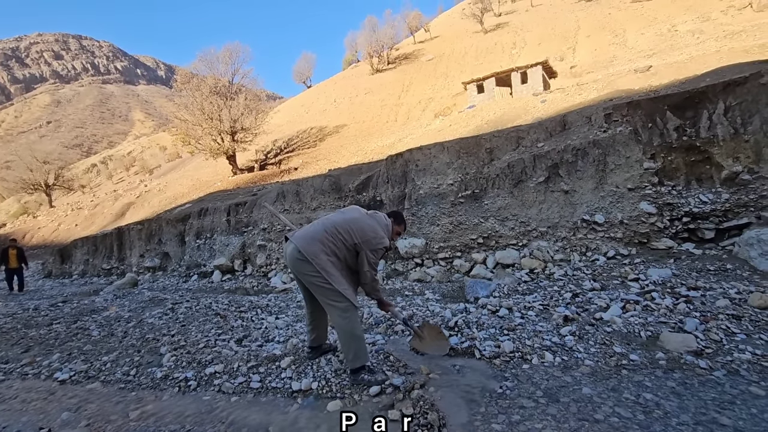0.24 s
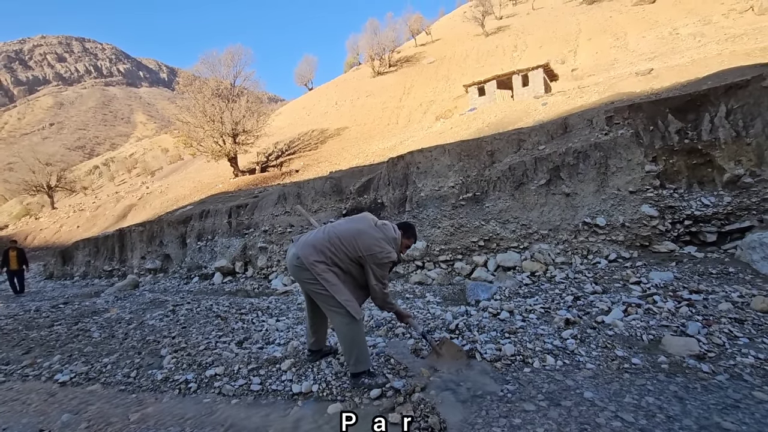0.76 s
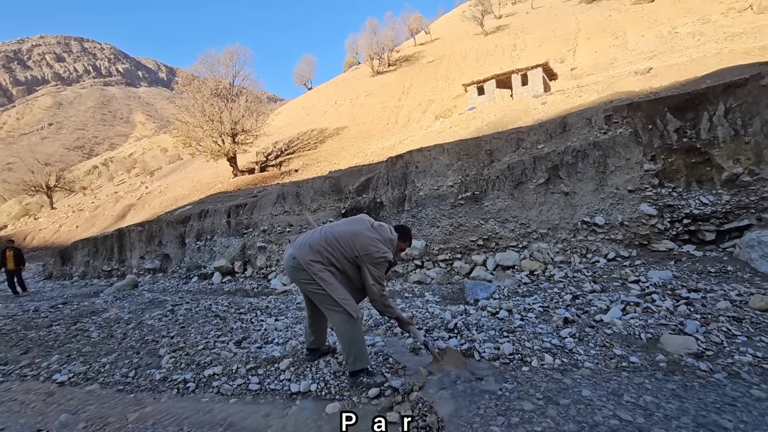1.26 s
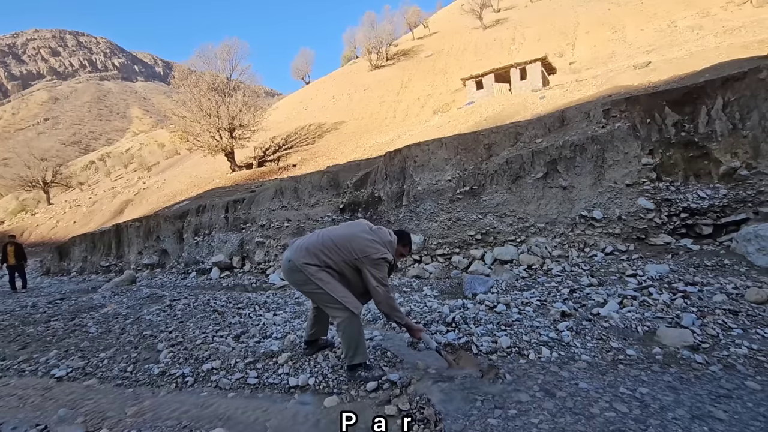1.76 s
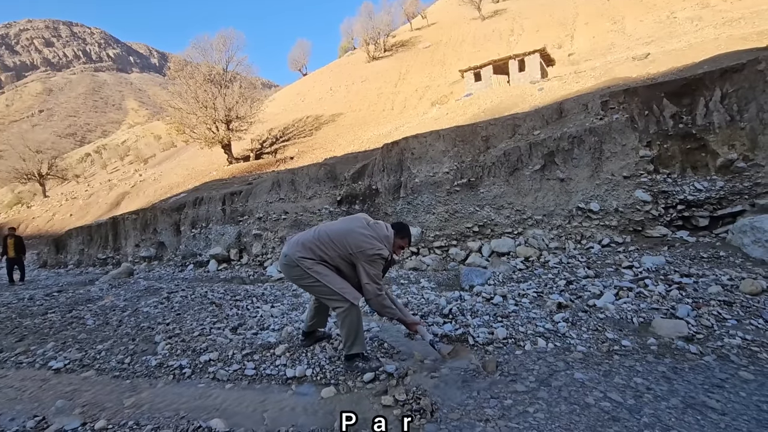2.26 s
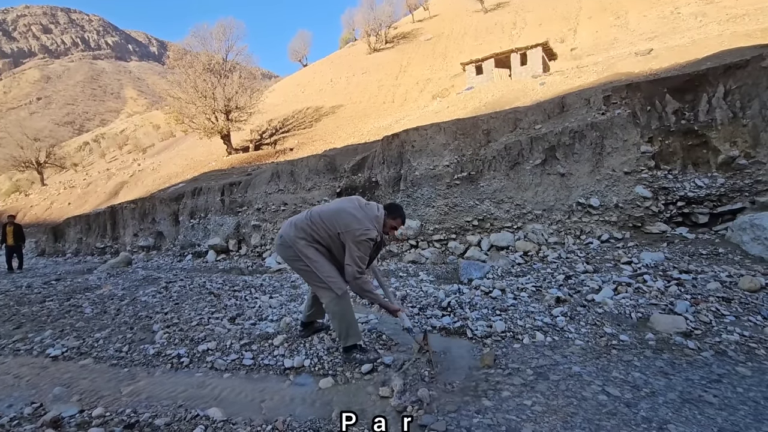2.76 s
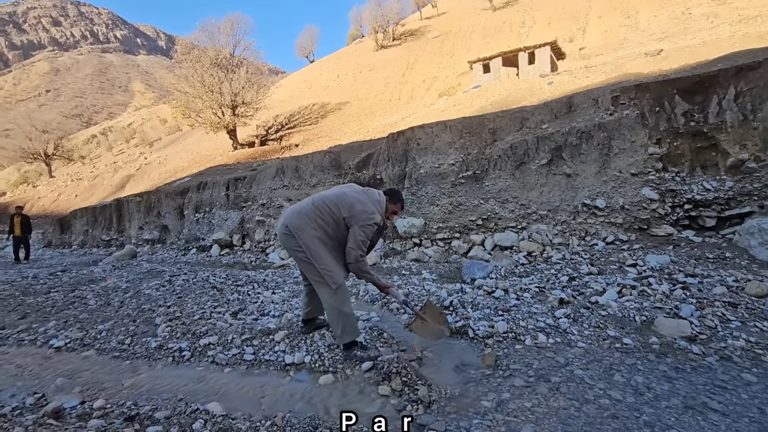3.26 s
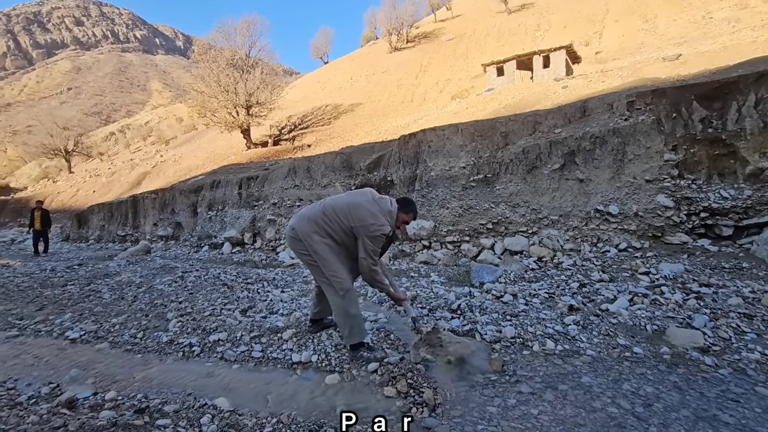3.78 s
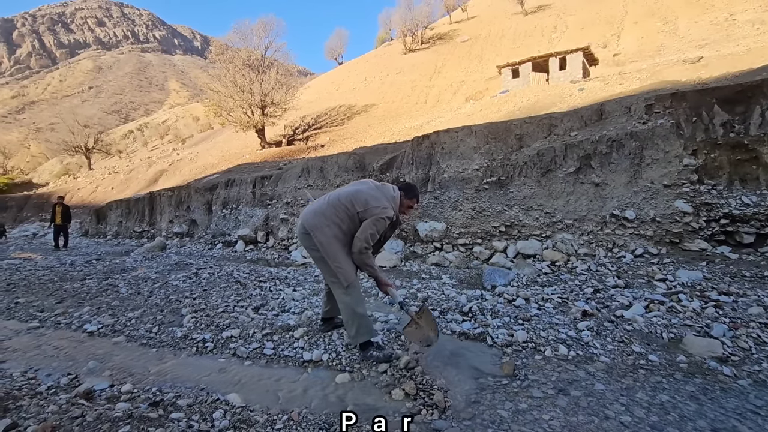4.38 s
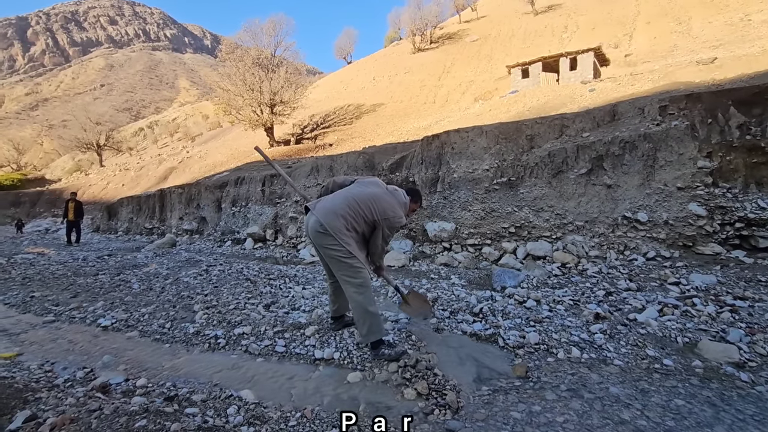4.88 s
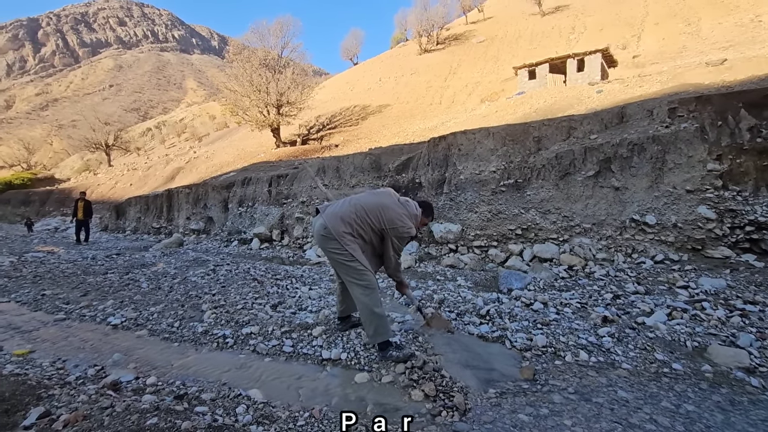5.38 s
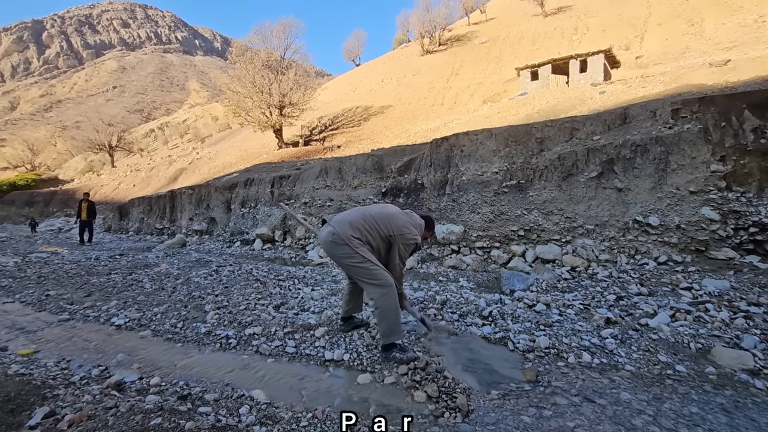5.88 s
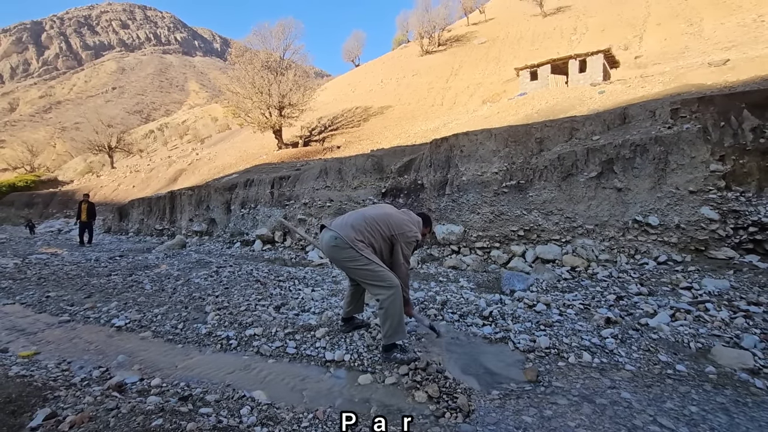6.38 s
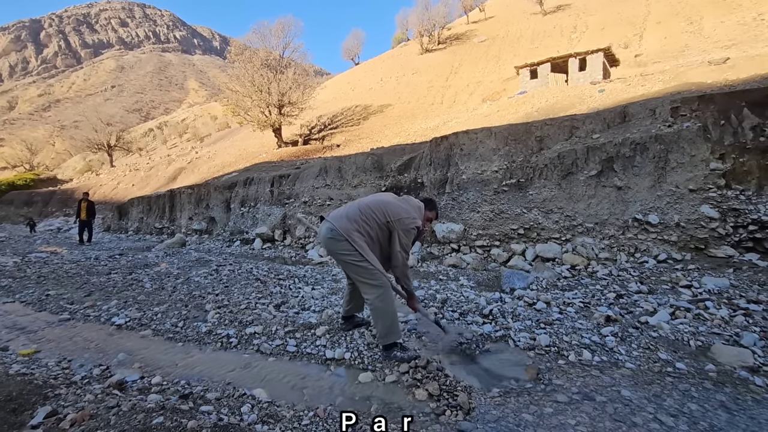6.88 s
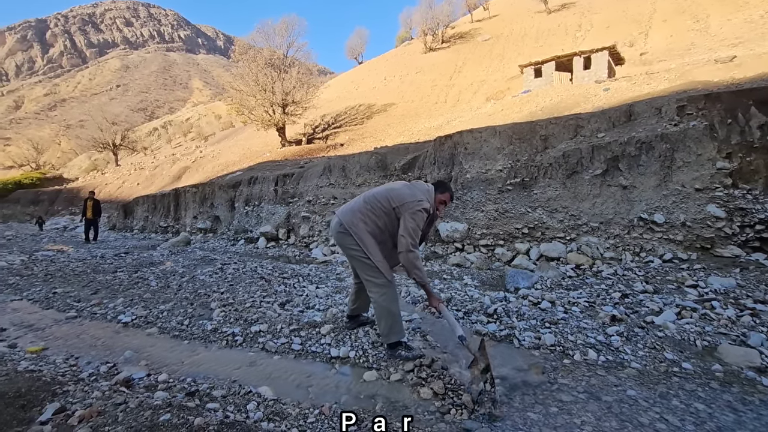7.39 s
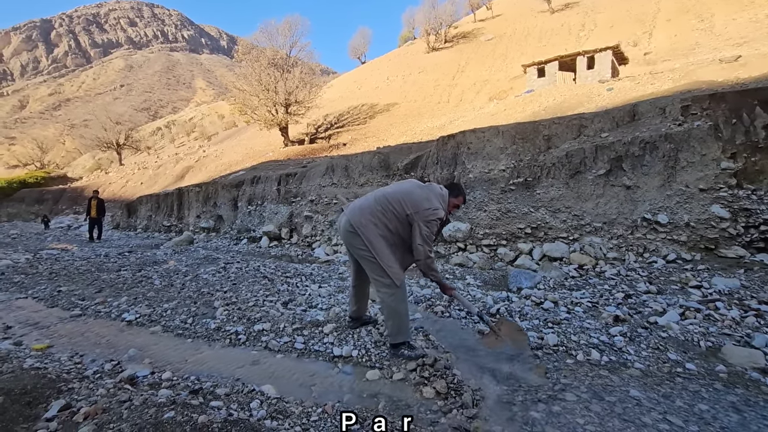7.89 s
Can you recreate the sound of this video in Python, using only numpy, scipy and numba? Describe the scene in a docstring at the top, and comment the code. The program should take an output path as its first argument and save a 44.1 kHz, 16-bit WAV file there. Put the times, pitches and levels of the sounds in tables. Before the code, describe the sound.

Close outdoor shovel digging in a stony stream: harsh metallic grinding, sharp stone clacks, soft underwater scuffs, splashes and pouring wet grit.

```python
"""In an open river bed, a steel shovel digs wet gravel out of a shallow stream.
The blade grinds and bites on stones: many small contacts crackle and ring its damped modes.
Stones knock as short rings, air pockets and bubbles ring with a climbing pitch, and filtered
clicks make the slosh, spray and pouring grit. Behind it runs the stream with a faint hum;
the pebble bed and an earth bank scatter the sound back."""
import sys
import numpy as np
from scipy import signal
from scipy.fft import rfft, irfft
from scipy.io import wavfile
from numba import njit

SR = 44100
rng = np.random.default_rng(int(sys.argv[2]) if len(sys.argv) > 2 else 0)


def bounce(signal):
    """Save signal as a 16-bit WAV file at the path given by the first command-line argument."""
    frames = np.transpose(np.atleast_2d(signal))
    limited = np.clip(frames, -1, 1)
    pcm = np.round(limited * 32767).astype(np.int16)
    wavfile.write(sys.argv[1], SR, pcm)


N = 358974
T = np.arange(N) / SR

# The blade is driven into the bed. Each row: time in seconds, hold in seconds, grinding level in dB
# before trims, treble relative to that in dB, centre of the lowest pair of blade modes in Hz.
THRUST_STROKES = [(0.323, 0.14, -32, -9, 626), (3.451, 0.45, -41, -4.5, 570),
                  (4.967, 0.21, -34.5, -1.5, 605), (8.027, 0.15, -33, -9.5, 640)]
# The buried blade is shoved on. Each row: time in seconds, hold in seconds, grinding level in dB
# before trims, treble relative to that in dB, centre of the lowest pair of blade modes in Hz.
PUSH_STROKES = [(0.595, 0.01, -46.5, -19, 600), (0.794, 0.056, -56, -7, 586), (0.887, 0.018, -44, -12, 607),
                (0.986, 0.34, -44.5, -19.5, 644), (1.191, 0.047, -38.5, -24, 663),
                (1.36, 0.087, -41.5, -13.5, 692), (1.742, 0.13, -47.5, -7.5, 598),
                (1.935, 0.029, -47, -13, 622), (3.598, 0.03, -29, -33, 573), (5.25, 0.06, -37, -12.5, 624),
                (5.571, 0.013, -42, -17, 633), (5.738, 0.0098, -44, -16, 598),
                (5.931, 0.064, -42, -15, 612), (6.257, 0.028, -44.5, -30, 614),
                (6.43, 0.023, -62.5, 4.5, 550)]
# The load is tipped out. Each row: time in seconds, pouring time in seconds, slosh level in dB,
# spray level in dB, fizz relative to the spray in dB, side part relative to the spray in dB.
TIPPED_LOADS = [(3.796, 0.75, -38.5, -43, -8.5, -20), (7.369, 0.23, -36, -44, 1.5, 5.5)]

# a positive slope swells during the hold, a negative one sags
THRUST_ATTACK_S, THRUST_SLOPE_DB_PER_S, THRUST_RELEASE_DB_PER_S = 0.0021, 9, 178
PUSH_ATTACK_S, PUSH_SLOPE_DB_PER_S, PUSH_RELEASE_DB_PER_S = 0.063, -26.5, 136
TIP_ATTACK_S = 0.0089


def grinding(low_hz, slip_db=2.5, level_db=-1, treble_db=-0.5, chip_db=-14, stone_db=-14, creep_db=-5,
             creep_treble_db=-14, sunk_db=-1, muffle_hz=1400, sunk_top_hz=7500, sink_db_per_s=25.5):
    """The blade sticks and slips through gravel while stones click; under water its treble is muffled."""
    slips = undb(slip_db * walk(rate=70))
    steel = unit(blade(clicks(rate=1300, spread_db=3.5), low_hz, low_db=11))
    chips = cloud(1950, 10400, cycles=35, spread_db=12.0, glide=0, count=4000)
    stones = cloud(1100, 4200, cycles=16, spread_db=5, glide=0, count=1400)
    grind = (steel + undb(chip_db) * chips + undb(stone_db) * stones) * slips
    body = unit(cut(grind, 1850, "low", order=3))
    edge = unit(cut(grind, 1840, "high", order=3))

    thrusts = 0
    for s, hold, db, treble, _ in THRUST_STROKES:
        stroke = effort(s, hold, THRUST_ATTACK_S, THRUST_SLOPE_DB_PER_S, THRUST_RELEASE_DB_PER_S)
        # water smothers the treble as the blade goes in
        edge_db = treble_db + treble - sink_db_per_s * np.maximum(T - s, 0)
        thrusts += undb(db) * stroke * (undb(level_db) * body + edge * undb(edge_db))

    body_gain = undb(creep_db) * wading()  # the sunken blade never lies quite still
    edge_gain = undb(creep_treble_db) * body_gain
    for s, hold, db, treble, _ in PUSH_STROKES:
        stroke = undb(db) * effort(s, hold, PUSH_ATTACK_S, PUSH_SLOPE_DB_PER_S, PUSH_RELEASE_DB_PER_S)
        body_gain = np.hypot(body_gain, stroke)
        edge_gain = np.hypot(edge_gain, stroke * undb(treble))
    sunk_body = unit(cut(cut(body, muffle_hz, "low", order=1), 185, "high", order=1))
    sunk_edge = unit(cut(edge, sunk_top_hz, "low", order=1))
    return thrusts + undb(sunk_db) * (sunk_body * body_gain + sunk_edge * edge_gain)


def bites(level_db=-1, stone_db=-7, contact=0.6, size=8192):
    """The edge meets a stone: a short crunch of fading clicks rings the blade and pushes stones aside."""
    # Each row: time in seconds, peak in dB before the shared trim, top of the crunch in Hz, time in
    # seconds for 30 dB of fading, centre of the lowest pair of blade modes in Hz, its strength in dB.
    bite_rows = [(0.3229, -9.5, 9800, 0.0073, 644, 20), (0.33, -14.5, 4400, 0.034, 624, 14),
                 (0.347, -19, 2400, .02, 630, 27), (0.386, -19.5, 2000, 0.018, 630, 14),
                 (0.428, -30, 2400, .015, 660, 13), (0.459, -28, 5000, 0.029, 610, 19),
                 (0.553, -33, 3050, .014, 565, 2), (0.728, -29, 1760, 0.047, 608, 15),
                 (0.89, -31.5, 2380, 0.02, 594, 6), (1.039, -31, 2200, 0.032, 603, 20),
                 (1.086, -31.5, 2000, 0.032, 694, 20), (1.214, -24, 1680, 0.06, 744, 13),
                 (1.270, -31, 2740, 0.019, 554, 16), (1.366, -30, 1790, 0.055, 610, 17),
                 (1.393, -17, 1900, 0.035, 686, 18), (1.405, -24, 2170, .018, 685, 8),
                 (1.439, -28.5, 1670, 0.053, 670, 14), (1.738, -26, 1660, 0.011, 602, 9),
                 (3.4596, -22, 2620, 0.019, 717, 16.5), (3.493, -21.5, 2010, 0.03, 663, 23),
                 (3.5658, -20.5, 3040, 0.022, 540, 12), (3.586, -19, 3200, 0.015, 575, -4),
                 (3.598, -23, 5500, 0.0053, 580, 0), (3.661, -23.5, 2410, 0.012, 470, 15),
                 (3.6914, -19, 2840, 0.0097, 493, 10), (3.748, -23, 3270, 0.039, 560, -5),
                 (3.834, -19.5, 3040, 0.01, 650, 21), (3.877, -24, 4470, 0.0079, 550, 2),
                 (3.959, -26.5, 2570, 0.014, 650, 20), (4.029, -27, 4500, 0.0051, 619, -2),
                 (4.4538, -11, 4300, 0.0045, 600, -6), (4.582, -29, 10400, 0.0032, 580, -10),
                 (4.986, -14, 6400, 0.018, 564, -4), (4.998, -10.5, 3800, 0.013, 520, 7),
                 (5.016, -23, 3650, 0.0074, 600, 0), (5.026, -18.5, 4800, 0.016, 614, -6),
                 (5.045, -19, 4870, .011, 573, -1), (5.057, -16.5, 4500, 0.0097, 574, -2),
                 (5.124, -17, 4050, 0.05, 620, 18), (5.148, -20.5, 3040, 0.057, 656, 22),
                 (5.18, -22, 3280, 0.059, 660, 13), (5.279, -33, 2000, 0.034, 653, 28),
                 (5.337, -30, 1990, 0.016, 613, 19), (5.581, -28.5, 2010, 0.017, 684, 11),
                 (5.769, -30.5, 1490, 0.064, 590, 5), (6.250, -38, 1110, 0.022, 623, 14),
                 (6.281, -39, 3000, 0.011, 635, -5), (6.491, -39, 1790, 0.062, 630, 7),
                 (8.029, -19.5, 9600, 0.005, 660, 8), (8.038, -23.5, 2200, .035, 690, 15),
                 (8.093, -25, 10100, 0.017, 658, 10), (8.118, -23.5, 9100, 0.014, 640, 12)]
    out = np.zeros((2, N))
    for s, db, bright_hz, length, low_hz, ring_db in bite_rows:
        decay = np.exp(-np.log(1000) * T[:size] / (2 * length))
        force = clicks(rate=18000, spread_db=3.0, size=size) * decay
        force[0, 0] += contact  # the first touch
        force = cut(cut(force, bright_hz, "low"), bright_hz / 4, "high", order=1)
        crunch = blade(force, np.full(size, float(low_hz)), ring_db)
        pushed_stones = clatter(0.84 * bright_hz, length, count=8)
        hit = crunch / np.abs(crunch[0]).max() + undb(stone_db) * pushed_stones
        add(out, s, hit * undb(db + level_db) / np.abs(hit[0]).max())
    return out


def blade(force, low_hz, low_db, low_width_hz=150.0, split=0.085):
    """Contacts crackle in gravel and ring damped steel modes, which shift as the contact point wanders."""
    # Blade modes above the lowest pair. Each row: middle pitch in Hz, width in Hz, level in dB.
    upper_modes = [(1052, 40, -3), (1275, 91, 7.5), (1510, 60, 3), (1704, 160, 4.5), (2084, 97, 8),
                   (2206, 56, 10), (2717, 110, 3.5), (3136, 260, 1), (3660, 93, -2), (7380, 320, -3.5)]
    # Colour of the gravel crackle. Each row: pitch in Hz, level in dB.
    gravel_colour = [(30, -69.5), (80, -9.5), (220, -5.5), (350, -6.5), (620, -1.5), (900, -4.5),
                     (1200, -5.5), (2000, -3.5), (4000, -4), (8000, -7.5), (12000, -14.5), (16000, -32.5)]
    size = len(low_hz)
    contact_rate = 40  # changes per second

    def drift():
        return 1 + 0.025 * walk(contact_rate, size)  # share of the pitch

    def struck():
        return force * undb(3.5 * (walk(contact_rate, size) - 1.5))  # sway of 3.5 dB

    out = colour(plate(force), gravel_colour)
    for sign in (-1, 1):  # the lowest modes are a close pair, filtered twice for steep sides
        centre = low_hz * (1 + sign * split) * drift()
        once = resonate(struck(), centre, low_width_hz)
        out += sign * undb(low_db) * resonate(once, centre, low_width_hz)
    for k, (hz, width, db) in enumerate(upper_modes):
        out += (-1) ** k * undb(db) * resonate(struck(), hz * drift(), float(width))
    return out


def knocks(second=1.35, second_db=-5, third=2.62, third_db=-8, crack_db=-11, level_db=0, size=4096):
    """Stones knock: each gives a few cycles of ring, two quicker overtones and a rough crack."""
    # Each row: time in seconds, peak in dB, pitch in Hz, time to fade by 60 dB in seconds.
    knock_rows = [(0.039, -31.5, 4300, 0.0057), (0.101, -31.5, 3480, 0.0041), (0.116, -28.5, 2140, 0.011),
                  (0.140, -43, 3230, 0.034), (0.199, -47, 1510, .012), (0.473, -11, 523, 0.028),
                  (0.659, -40.5, 4600, .023), (0.797, -37, 461, 0.15), (0.837, -41.5, 9500, .012),
                  (0.84, -33.5, 500, 0.11), (0.937, -33, 710, 0.16), (0.963, -39, 745, 0.057),
                  (0.986, -33, 710, 0.16), (1.144, -25, 585, 0.064), (1.468, -38, 8200, 0.0046),
                  (1.795, -32, 1220, 0.024), (1.821, -37.5, 1030, 0.047), (1.843, -36, 1280, 0.019),
                  (2.384, -34, 810, 0.034), (2.7067, -32.5, 1070, 0.019), (3.030, -28.5, 1200, 0.012),
                  (3.077, -25, 4000, .005), (3.374, -37, 1330, 0.026), (3.4084, -26.5, 4300, 0.0068),
                  (3.6055, -9, 620, 0.01), (3.606, -11, 1100, 0.058), (3.614, -15, 1250, 0.026),
                  (3.637, -38.5, 1590, 0.017), (4.375, -32, 815, 0.031), (4.404, -18.5, 1240, 0.0068),
                  (4.4545, -5, 1840, 0.0085), (4.511, -28, 2680, 0.0064), (4.615, -32, 5940, 0.0016),
                  (4.645, -25.5, 8200, 0.013), (4.655, -21.5, 7300, 0.0049), (4.744, -38, 1850, 0.032),
                  (4.967, -14.5, 590, 0.009), (5.402, -36.5, 684, 0.062), (5.543, -47, 570, 0.036),
                  (5.726, -45, 496, .04), (5.924, -31.5, 765, 0.052), (6.412, -42, 450, .05),
                  (6.549, -38.5, 1570, 0.051), (6.652, -43.5, 1100, 0.056), (6.7843, -33, 2330, 0.013),
                  (7.021, -37, 1400, 0.024), (7.03, -42, 484, 0.041), (7.078, -37, 576, 0.079),
                  (7.08, -39, 1540, .03), (7.149, -39.5, 553, 0.34), (7.151, -38, 1100, 0.055),
                  (7.208, -37, 820, 0.055), (7.231, -36, 2390, 0.012), (7.267, -26.5, 2900, 0.0042),
                  (7.267, -43, 483, 0.12), (7.336, -31, 3600, 0.008), (7.448, -14, 1210, 0.014),
                  (7.513, -15.5, 1860, 0.0073), (7.629, -21, 1960, .01), (7.768, -45.5, 536, 0.078),
                  (7.825, -35, 1525, 0.049), (7.91, -27, 3820, 0.0055), (8.1018, -14.5, 570, 0.041)]
    out, t = np.zeros((2, N)), T[:size]
    for (s, db, hz, t60), side in zip(knock_rows, rng.choice([-1, 1], len(knock_rows))):
        decay = np.exp(-np.log(1000) * t / t60)
        phase = 2 * np.pi * hz * t
        ring = decay * np.sin(phase)
        ring += undb(second_db) * decay ** 2 * np.sin(second * phase)
        ring += undb(third_db) * decay ** 3 * np.sin(third * phase)
        crack = cut(rng.standard_normal((2, size)) * decay, 4.0 * hz, "low", order=3)
        hit = np.outer([1, 0.53 * side], ring) + undb(crack_db) * crack
        hit = cut(hit, 0.51 * hz, "high")  # a small body radiates no bass
        add(out, s, hit * undb(db + level_db) / np.abs(hit[0]).max())
    return out


def lumps(level_db=0):
    """Lumps of wet gravel fall off the blade and break up, each in a short clatter of pebbles."""
    # Each row: time in seconds, peak in dB, middle pitch of the pebbles in Hz, scatter time in seconds.
    lump_rows = [(0.035, -45, 3020, .012), (0.112, -30.5, 3200, .012), (2.234, -35, 1800, 0.024),
                 (2.35, -38, 744, 0.043), (2.419, -43, 850, 0.015), (2.583, -33.5, 2190, 0.0049),
                 (2.67, -27.5, 4000, .008), (2.706, -33, 5070, 0.0037), (2.928, -26.5, 7100, 0.0037),
                 (3.029, -28.5, 3600, 0.0061), (3.254, -23, 4240, 0.0078), (3.268, -22, 4800, 0.0046),
                 (3.329, -35, 5500, 0.0074), (3.43, -28.5, 6500, 0.003), (4.582, -28, 4020, .003),
                 (4.646, -28.5, 2930, .006), (5.575, -36, 2580, .015), (5.762, -35.5, 2800, .015),
                 (7.023, -31.5, 6000, 0.0066), (7.138, -36.5, 1650, 0.021), (7.25, -43, 2500, .03),
                 (7.348, -24, 3350, .015), (7.365, -22.5, 1670, .012), (7.396, -20.5, 1440, 0.014),
                 (7.465, -24, 2610, 0.009), (7.476, -25, 895, 0.011), (7.52, -22, 2020, .014),
                 (7.558, -30, 1090, 0.011), (7.582, -20.5, 1190, .016), (7.61, -28.5, 900, 0.0048),
                 (7.645, -30.5, 1230, .008), (7.731, -26.5, 1460, 0.011), (7.752, -30.5, 3500, .008)]
    out = np.zeros((2, N))
    for s, db, hz, length in lump_rows:
        add(out, s, undb(db + level_db) * clatter(hz, length))
    return out


def clatter(hz, length, count=16, octaves=0.53, cycles=10, spread_db=4, size=8192):
    """Pebbles strike one after another, each with its own pitch, the later ones softer; peak 1."""
    when, damping, side = rng.random((count, 3)).T
    pitch, loud = rng.standard_normal((count, 2)).T
    when = (when - when.min()) ** 1.5  # crowded towards the start
    pitches = np.minimum(hz * 2 ** (octaves * pitch), SR / 3)
    gain = undb(spread_db * loud) * np.exp(-when) * (-1) ** np.arange(count)
    t60 = cycles * (0.5 + damping) / pitches
    rows = np.transpose([when * length, gain, 2 * side - 1, pitches, t60])
    hit = cut(rings(rows, 0.0)[:, :size], hz / 2, "high")
    return hit / np.abs(hit[0]).max()


def pebbles_shift(stroke_db=-17, wash_db=-18, settle_db=40):
    """Loose pebbles click while the blade pushes or tipped water washes them, and for a while after."""
    ticks = unit(plate(cloud(1000, 5000, cycles=11, spread_db=4.5, glide=0, count=520), t60=0.006))
    stirred = [undb(db + stroke_db) * envelope(s, hold, PUSH_ATTACK_S, 0, settle_db)
               for s, hold, db, *_ in PUSH_STROKES]
    washed = [undb(db + wash_db) * envelope(s, length, TIP_ATTACK_S, 0, settle_db)
              for s, length, db, *_ in TIPPED_LOADS]
    return ticks * np.max(stirred + washed, axis=0)


def thuds(level_db=-23, top_hz=75, release_db=60):
    """Each thrust shakes the bed: low-passed noise makes a dull rumble that dies away."""
    rumble = unit(cut(cut(rng.standard_normal((2, N)), top_hz, "low"), 41, "high"))
    return rumble * sum(undb(db + level_db) * envelope(s, 0, THRUST_ATTACK_S, 0, release_db)
                        for s, _, db, *_ in THRUST_STROKES)


def gulps(level_db=-1, glide=0.22, churn_db=5, size=8192):
    """An air pocket closes behind the blade: it rings low and climbs, and the gravel shifts dully."""
    # Each row: time in seconds, peak in dB before the shared trim, starting pitch in Hz,
    # time for the ring to fade by 60 dB in seconds.
    gulp_rows = [(0.359, -28.5, 219, 0.014), (0.473, -22, 208, 0.022), (0.493, -29, 270, 0.099),
                 (1.314, -27, 416, 0.12), (2.696, -42, 353, 0.056), (3.711, -22.5, 388, 0.054),
                 (3.741, -23.5, 260, 0.054), (3.832, -20.5, 217, 0.06), (3.86, -26, 217, 0.05),
                 (4.058, -47, 238, 0.17), (4.139, -42.5, 270, 0.11), (4.967, -41, 238, 0.18),
                 (5.132, -28.5, 241, 0.12), (5.768, -38, 267, 0.13), (5.935, -30, 213, 0.085),
                 (6.27, -43, 320, 0.14), (7.097, -42.5, 273, 0.25), (7.41, -25, 497, 0.1),
                 (8.101, -23, 256, 0.039)]
    out, t = np.zeros((2, N)), T[:size]
    for s, db, hz, t60 in gulp_rows:
        churn = rng.standard_normal((2, size)) * np.exp(-np.log(1000) * t / (2 * t60))
        churn = cut(churn, 2.17 * hz, "low", order=4)
        climbing = np.sin(2 * np.pi * hz * t * (1 + glide * t / t60))
        ring = np.exp(-np.log(1000) * t / t60) * climbing
        gulp = np.outer([1, 0], ring) + undb(churn_db) * churn
        gulp = cut(gulp, hz * hz / 420, "high", order=3)  # small pockets carry no bass
        add(out, s, gulp * undb(db + level_db) / np.abs(gulp[0]).max())
    return out


def glugs(stir_db=1.5, large_db=-4, small_db=-6.0):
    """Bubbles roll off the sunken blade in uneven bursts, each climbing in pitch."""
    large = cloud(390, 700, cycles=28, spread_db=3.0, glide=0.2, count=700)
    small = cloud(760, 2200, cycles=32, spread_db=4.0, glide=0.2, count=480)
    bursts = undb(stir_db * walk(rate=8.7))
    return (undb(large_db) * large + undb(small_db) * small) * bursts * wading()


def droplets(level_db=-28, low_hz=5000, top_hz=11000):
    """Single drops flicked up by the wading blade land with thin ticks."""
    ticks = plate(clicks(rate=45, spread_db=3.5), t60=0.008)
    return undb(level_db) * unit(cut(cut(ticks, low_hz, "high"), top_hz, "low")) * wading()


def wading(attack_s=0.078, release_db_per_s=80):
    """How hard the sunken blade stirs the water and the bed, as a gain over time."""
    # Each row: start in seconds, end in seconds, level in dB before each sound's own trim.
    wade_rows = [(0.756, 1.593, -49.5), (1.72, 2.073, -55), (2.216, 3.214, -56), (5.602, 6.077, -53),
                 (6.257, 6.823, -56), (7.037, 7.33, -54)]
    return sum(undb(db) * envelope(s, end - s, attack_s, 0, release_db_per_s) for s, end, db in wade_rows)


def spills(bubble_db=-5, plop_db=-5, splat_db=-6, spray_db=-4, grit_db=-2, surge_db=5, lap_db=3.5,
           patter_db=1.0):
    """Water slaps back in the stream, traps bubbles and throws a fine spray; grit patters down with it."""
    # Colour of the slosh. Each row: pitch in Hz, level in dB.
    slosh_colour = [(40, -50), (110, -22), (190, -13.5), (330, -19.5), (520, -5.5), (850, -2.5),
                    (1200, 4.5), (2200, -7), (3200, -3), (6000, -25), (16000, -56.5)]
    # Colour of the spray. Each row: pitch in Hz, level in dB.
    spray_colour = [(500, -109), (1800, -4.5), (3200, -0.5), (5000, 1), (6500, -1.5), (7500, 1.5),
                    (10000, -5.5), (11700, -4), (16000, -8.5)]
    drops = clicks(rate=6000, spread_db=3.0) * undb(surge_db * walk(rate=64))
    froth = cloud(241.0, 5080, cycles=15.0, spread_db=0.0, glide=0.24, count=8000)
    froth = unit(colour(froth, slosh_colour))
    plops = cloud(450, 2800, cycles=26, spread_db=3, glide=0.25, count=1800)
    grit = cloud(1304, 14250, cycles=18, spread_db=3.5, glide=0, count=24000)
    grit = unit(colour(grit, spray_colour))
    slosh = undb(splat_db) * unit(colour(drops, slosh_colour))
    slosh += undb(bubble_db) * froth + undb(plop_db) * plops
    spray = undb(spray_db) * unit(colour(drops, spray_colour)) + undb(grit_db) * grit
    fizz = 0.36 * cloud(8500, 13000, cycles=50, spread_db=13.0, glide=0, count=20000)
    slosh_gain, spray_gain, side_gain, fizz_gain = water_flow()
    laps = undb(lap_db * walk(rate=11))
    patter = undb(patter_db * walk(rate=20))
    flying = spray * [spray_gain, side_gain] + fizz * fizz_gain
    return slosh * laps * slosh_gain + flying * patter


def water_flow():
    """Gains of slosh, spray, its side part and fizz: sweeps swell, a tipped load starts full and drains."""
    # The blade is swept through the stream and lifted. Each row: time in seconds, length in seconds,
    # final slosh level in dB, final spray level in dB, fizz relative to the spray in dB,
    # side part relative to the spray in dB.
    sweep_rows = [(2.211, 0.25, -51, -59, -21, -8), (2.651, 0.54, -44.5, -39, -17, -15),
                  (6.575, 0.74, -52.5, -51.5, -3, 2.5)]
    sweep_attack_s, sweep_release = 0.15, 50  # release in dB per second
    # dB per second: ever more water runs off as the blade comes up
    slosh_swell, spray_swell = 9.5, 28.5
    slosh_slope, spray_slope = -14, -9.5  # of a tipped load, dB per second
    drain, drip = 113, 65  # dB per second: the slosh stops sooner than the spray
    spray_lead_s = 0.028  # thrown drops land before the bulk of the load
    flows = []
    for s, length, slosh_db, spray_db, fizz_db, side_db in sweep_rows:
        slosh = envelope(s, length, sweep_attack_s, slosh_swell, sweep_release)
        slosh = undb(slosh_db - slosh_swell * length) * slosh
        spray = envelope(s, length, sweep_attack_s, spray_swell, sweep_release)
        spray = undb(spray_db - spray_swell * length) * spray
        flows.append([slosh, spray, undb(side_db) * spray, undb(fizz_db) * spray])
    for s, length, slosh_db, spray_db, fizz_db, side_db in TIPPED_LOADS:
        slosh = undb(slosh_db) * envelope(s, length, TIP_ATTACK_S, slosh_slope, drain)
        spray = undb(spray_db) * envelope(s - spray_lead_s, length, TIP_ATTACK_S, spray_slope, drip)
        flows.append([slosh, spray, undb(side_db) * spray, undb(fizz_db) * spray])
    return np.linalg.norm(flows, axis=0)


def pour(spread_db=2.0, clump_db=4.5, slope_db_per_s=-18.5, release_db_per_s=145):
    """Fine wet gravel slides off the blade and lands in a dense rattle of uneven clicks."""
    # The one pour: time in seconds, pouring time in seconds, level in dB.
    pour_event = (7.364, 0.26, -33)
    # Colour of the fine gravel. Each row: pitch in Hz, level in dB.
    fines_colour = [(100, -18.5), (350, -12), (600, 1), (950, -8), (1350, 2.5), (2000, -4.5), (3200, -7.5),
                    (5500, -23), (16000, -31)]
    s, length, db = pour_event
    grains = clicks(rate=9700, spread_db=spread_db) * undb(clump_db * walk(rate=43))
    grains = unit(colour(grains, fines_colour))
    return undb(db) * grains * envelope(s, length, TIP_ATTACK_S, slope_db_per_s, release_db_per_s)


def pebbles_drop(level_db=-9, spread_db=5.0):
    """Single pebbles roll off the lifted blade and tick on the stones below, as loud as the spray flows."""
    ticks = plate(cloud(1500, 7000, cycles=15, spread_db=spread_db, glide=0, count=380), t60=0.0063)
    spray_gain = water_flow()[1]
    return undb(level_db) * unit(ticks) * spray_gain


def stream(rush_db=-65.0, trickle_db=-69, hum_db=-74, hum_hz=64.6):
    """Shallow water rustles as dense clicks and tinkles as bubbles; a faint low hum slowly grows."""
    # Colour of the rustle. Each row: pitch in Hz, level in dB.
    stream_colour = [(25, -3), (60, 14.5), (120, 5), (300, 1), (600, 5.5), (1000, -2), (2200, 6),
                     (4000, -2.5), (8000, -8), (16000, -18)]
    rush = unit(colour(clicks(rate=9000, spread_db=4.0), stream_colour)) * undb(1.1 * walk(rate=3.2))
    trickle = cloud(600, 6000, cycles=24, spread_db=3.5, glide=0.15, count=900)
    hum = np.sqrt(2) * np.sin(2 * np.pi * hum_hz * T + 0.16 * walk(rate=2.9))
    hum *= np.interp(T, [0, 3, 8], [0.3, 0.7, 1.3])
    return undb(rush_db) * rush + undb(trickle_db) * trickle + np.outer([undb(hum_db), 0], hum)


def scatter(x, t60, db, top_hz, delay):
    """A diffuse reflection, duller than the direct sound: fading noise serves as the echo."""
    decay = fade(t60)
    noise = rng.standard_normal((2, 2 * SR))[:, :len(decay)]
    echo = unit(cut(noise, top_hz, "low", order=1) * decay) / np.sqrt(len(decay))
    echo = np.pad(echo, ((0, 0), (int(delay * SR), 0)))
    return undb(db) * signal.oaconvolve(x[:1], echo)[:, :N]


def envelope(s, hold, attack, slope_db, release_db):
    """Rise until s, tilt by slope_db a second during the hold, then fall by release_db a second."""
    age = T - s
    rise = np.clip(1 + age / attack, 0, 1)
    return rise * undb(slope_db * np.clip(age, 0, hold) - release_db * np.maximum(age - hold, 0))


def effort(s, hold, attack, slope_db, release_db, settle_db=-14.5, settle_db_per_s=78):
    """One stroke of the blade, and the loosened gravel that keeps shifting after it."""
    stroke = envelope(s, hold, attack, slope_db, release_db)
    settling = undb(settle_db) * envelope(s, hold, attack, slope_db, settle_db_per_s)
    return np.maximum(stroke, settling)


def clicks(rate, spread_db, size=N):
    """Many small and a few large contacts, each from its own direction: a (mid, side) pair."""
    present = rng.random(size) < rate / SR
    loud_db = spread_db * np.minimum(rng.exponential(size=size), 4.5)
    force = present * undb(loud_db) * rng.choice([-1, 1], size)
    return np.array([force, force * rng.standard_normal(size)])


def cloud(low_hz, high_hz, cycles, spread_db, glide, count):
    """Bubbles or pebbles of all sizes ring at random, a few of them loud."""
    when, pitch, loud, damping, side = rng.random((count, 5)).T
    hz = low_hz * (high_hz / low_hz) ** pitch
    gain = undb(-spread_db * np.log(loud + 0.043)) * (-1) ** np.arange(count)
    t60 = cycles * (0.5 + damping) / hz
    rows = np.transpose([when * N / SR, gain, np.sqrt(3) * (2 * side - 1), hz, t60])
    return unit(cut(rings(rows, float(glide)), low_hz, "high"))


@njit
def rings(rows, glide):
    """Sum fading sines from rows (s, gain, side share, Hz, t60 s); their pitch climbs by glide."""
    out = np.zeros((2, N))
    for s, gain, side, hz, t60 in rows:
        start, length = int(s * SR), int(t60 * SR)
        z = gain + 0j  # a shrinking, turning pointer
        turn = np.exp((2j * np.pi * hz - np.log(1000) / t60) / SR)
        climb = np.exp(2j * np.pi * hz * glide / (t60 * SR * SR))
        for i in range(max(start, 0), min(start + length, N)):
            out[0, i] += z.imag
            out[1, i] += z.imag * side
            z, turn = z * turn, turn * climb
    return out


def plate(force, t60=0.01, size=1024):
    """A steel sheet smears every contact over a dense cluster of short modes."""
    ring = rng.standard_normal(size) * np.exp(-np.log(1000) * T[:size] / t60)
    spectrum = rfft(ring)
    flat = irfft(spectrum / np.abs(spectrum))  # smears time, keeps the colour
    return signal.oaconvolve(force, flat[None])[:, :force.shape[1]]


@njit
def resonate(x, hz, width):
    """Band-pass on a pair, with a centre that may move."""
    y = np.empty_like(x)
    for c in range(2):
        band, low = 0.0, 0.0
        for i in range(x.shape[1]):
            g, k = np.tan(np.pi * hz[i] / SR), width / hz[i]
            v = (band + g * (x[c, i] + 1e-18 - low)) / (1 + g * (g + k))
            band, low, y[c, i] = 2 * v - band, low + 2 * g * v, k * v
    return y


def colour(x, points, size=2048):
    """Causal filter that follows (Hz, dB) points."""
    hz, db = np.transpose(points)
    grid = np.linspace(1, SR / 2, size + 1)
    cepstrum = irfft(np.log(undb(np.interp(np.log(grid), np.log(hz), db))))
    cepstrum[1:size] *= 2  # folded so that the filter only acts after each input
    cepstrum[size + 1:] = 0
    response = irfft(np.exp(rfft(cepstrum)))[None, :size]
    return signal.oaconvolve(x, response)[:, :x.shape[1]]


def cut(x, hz, kind, order=2):
    """Low- or high-pass."""
    return signal.sosfilt(signal.butter(order, min(hz, SR / 2 - 1), kind, fs=SR, output="sos"), x)


def walk(rate, size=N):
    """A random level with a new value every 1 / rate s, joined by straight lines."""
    return np.interp(T[:size] * rate, np.arange(4096), rng.standard_normal(4096))


def undb(db):
    """Decibels to gain."""
    return 10 ** (np.asarray(db) / 20)


def unit(x):
    """Scale a (mid, side) pair to a mid rms of 1."""
    return x / np.sqrt(np.mean(x[0] ** 2))


def fade(t60):
    """An exponential decay, down to -60 dB."""
    return np.exp(-np.log(1000) * T[:int(t60 * SR) + 2] / t60)


def add(out, s, x):
    """Mix x into out from time s."""
    i = max(int(s * SR), 0)
    out[:, i:i + x.shape[1]] += x[:, :max(N - i, 0)]


def scene():
    """Shovel, stones and water, with the scatter of pebbles and bank; the treble is the widest."""
    # Width of the sound. Each row: pitch in Hz, gain of the side signal in dB.
    width_colour = [(60, -15), (300, -13), (700, -12), (1400, -7.5), (2400, -5.5), (4400, -0.5), (8000, 4),
                    (15000, 3.5)]
    s, hold, _, _, hz = np.transpose(sorted(THRUST_STROKES + PUSH_STROKES))
    low_hz = np.interp(T, s + hold / 2, hz)  # its load of wet gravel detunes the blade
    direct = grinding(low_hz) + bites() + knocks() + lumps() + pebbles_shift() + thuds()
    direct += gulps() + glugs() + droplets() + spills() + pour() + pebbles_drop()
    fine = cut(direct, 1200, "high")  # pebbles throw back only the short waves
    pebbles = scatter(fine, t60=0.03, db=-14, top_hz=7000, delay=0.001)
    bank = scatter(direct, t60=0.35, db=-31, top_hz=3000, delay=0.02)
    mid, side = direct + pebbles + bank + stream()
    lean = 0.078  # share of the middle that leans right, before the width filter
    side = colour((side - lean * mid)[None], width_colour)[0]
    return np.array([np.roll(mid + side, 1), mid - side])  # left one sample late: just right of centre


def record(dry):
    """The recorder cuts the top with a steep low-pass at 16100 Hz."""
    return signal.sosfilt(signal.ellip(10, 0.2, 70, 16100, fs=SR, output="sos"), dry)


dry = scene()
out = record(dry)
bounce(out)
```